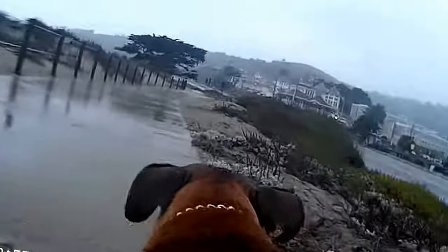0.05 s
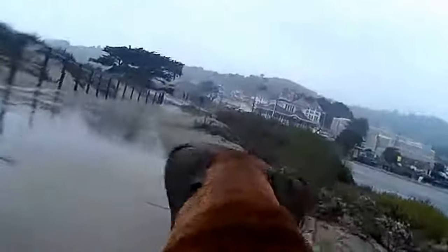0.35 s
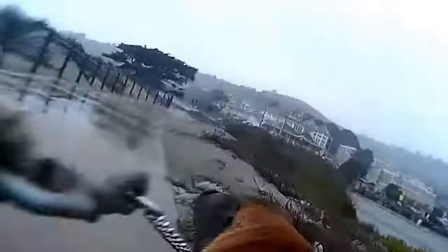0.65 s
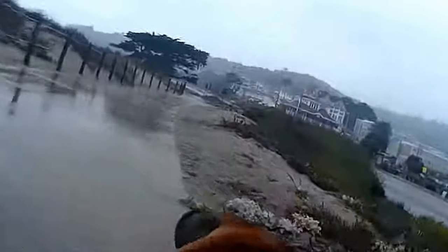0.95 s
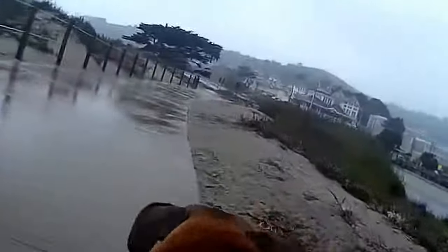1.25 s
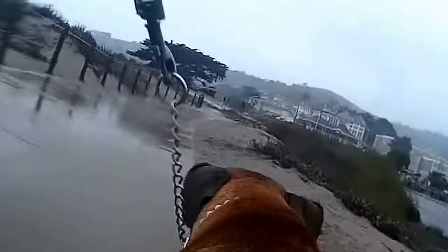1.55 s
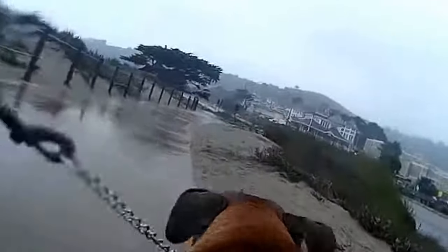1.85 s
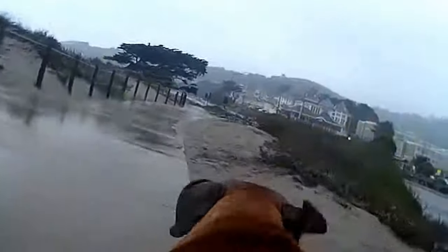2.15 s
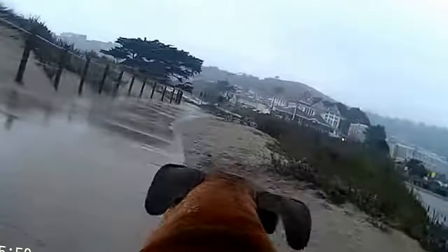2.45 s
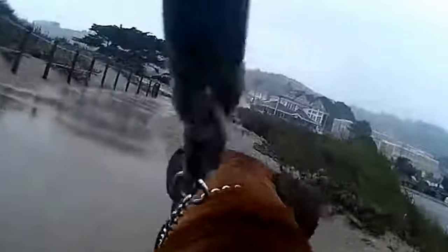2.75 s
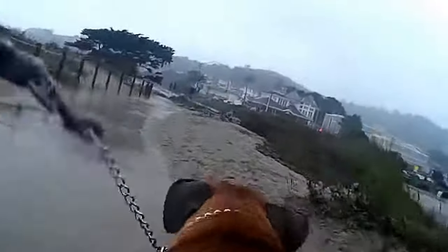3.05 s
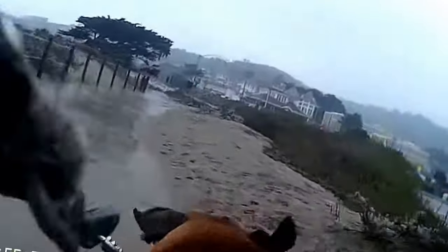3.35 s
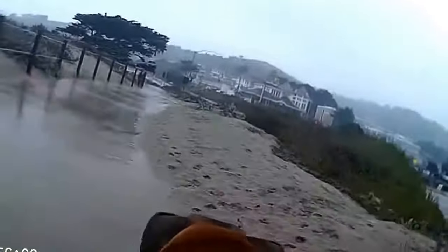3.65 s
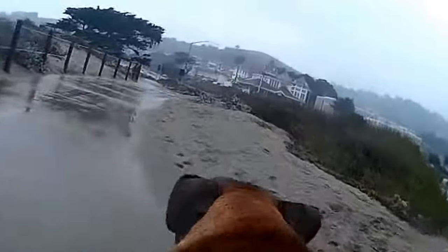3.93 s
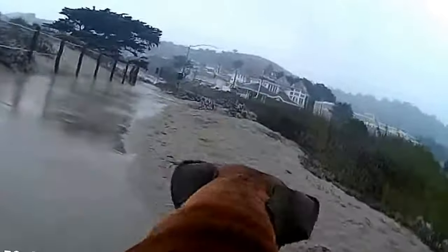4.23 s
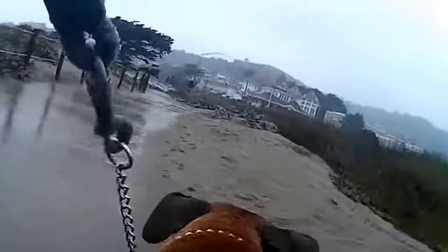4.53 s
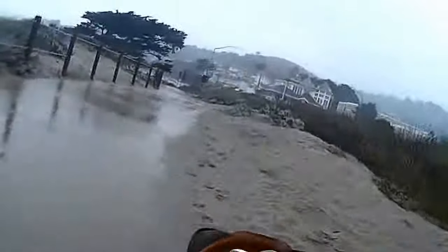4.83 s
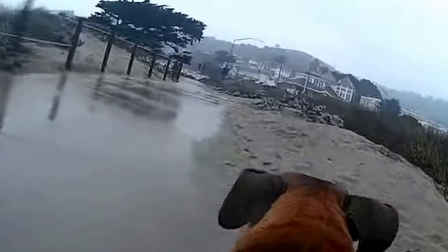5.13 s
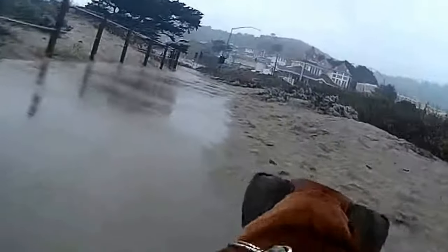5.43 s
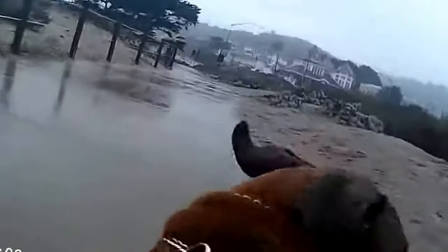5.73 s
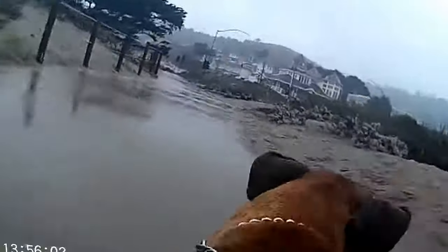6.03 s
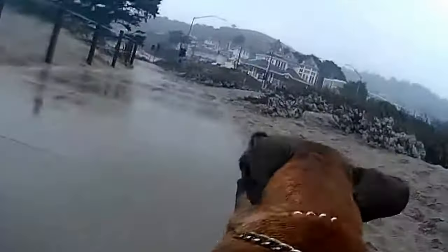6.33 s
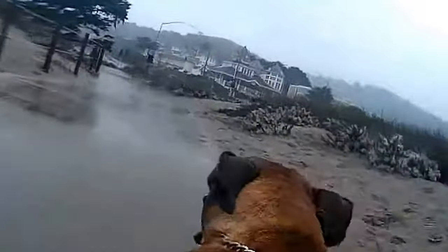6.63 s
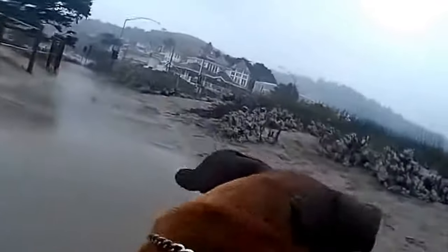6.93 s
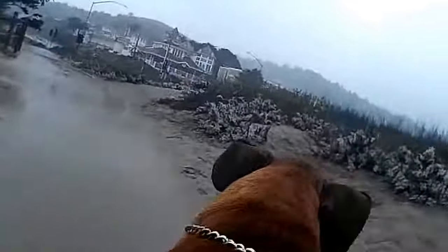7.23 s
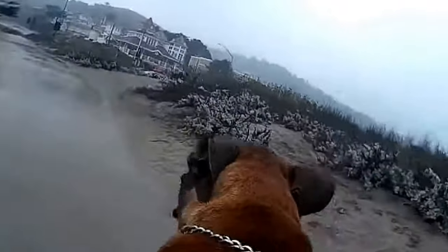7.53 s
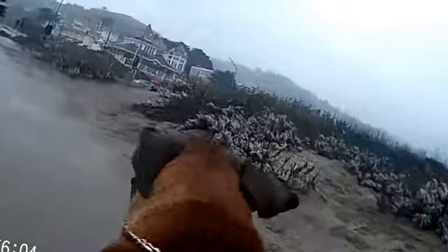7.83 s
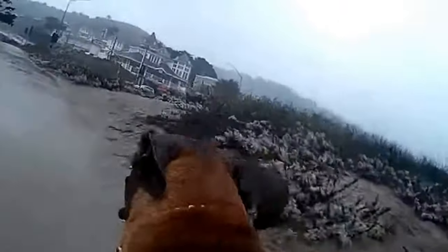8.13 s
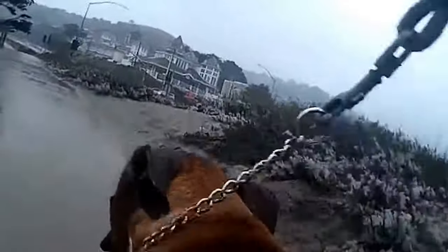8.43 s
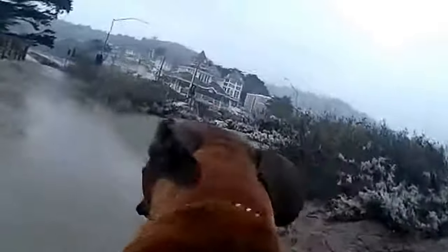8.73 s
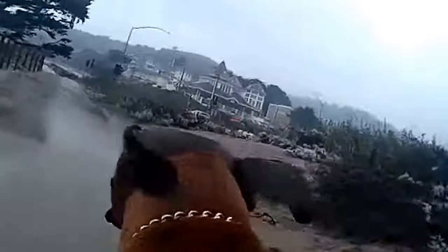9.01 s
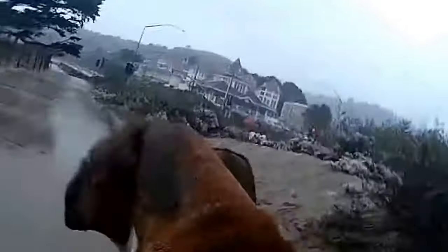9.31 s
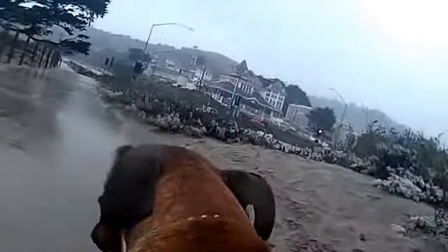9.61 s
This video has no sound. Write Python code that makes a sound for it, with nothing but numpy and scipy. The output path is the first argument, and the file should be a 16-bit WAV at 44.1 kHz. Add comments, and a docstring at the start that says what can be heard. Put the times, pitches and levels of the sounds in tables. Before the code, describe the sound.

Heard from inside a small plastic camera strapped to a moving dog, a low rumble and faint drizzle are soon broken by very close, hard clacks and short gritty rubs from a leash clip and chain. They crowd together in the middle, the hardest slightly overloading the microphone, then pause and return in one last flurry. Between them are light link ticks, dull bumps and soft footfalls on wet sand.

```python
"""Low rumble and muffled drizzle, soon broken by loud knocks on plastic: a small camera rides on a dog
trotting along a wet path. The leash clip and chain strike and rub the case, exciting its damped modes,
and the mount thuds with each blow; the hardest blows overload the microphone. Between them come soft
footfalls, dull bumps of the mount and faint chain ticks. A very faint whine joins late."""
import sys
import numpy as np
from scipy import signal
from scipy.fft import irfft, next_fast_len
from scipy.io import wavfile

SR = 44100
rng = np.random.default_rng(int(sys.argv[2]) if len(sys.argv) > 2 else 0)


def put_to_file(sound):
    """Save the sound as 16-bit audio at rate SR, in the file named by the first command-line argument."""
    columns = np.atleast_2d(sound).T  # one column per channel
    safe = np.clip(columns, -1, 1)
    whole_steps = np.round(safe * 32767)
    wavfile.write(sys.argv[1], SR, whole_steps.astype(np.int16))


N = 430857

# How hard the harness rocks on the dog's back: t/s, level/dB
ROCKING_LEVELS = [(0.0, -53), (0.49, -44.5), (1.71, -48), (2.99, -45), (4.49, -45), (4.79, -41),
                  (5.69, -47), (5.85, -40.5), (6.8, -44.5), (7.51, -46.5), (7.92, -40.5), (8.19, -47.5),
                  (9.03, -46), (9.77, -40.5)]
# Chain and strap dragged over the case, levels relative:
# start t/s, end t/s, early level/dB, late level/dB, favoured f/Hz, tug level/dB
DRAGS = [(0.538, 0.631, -35.5, -33, 3040, -43.5), (1.19, 1.201, -36, -37.5, 1600, -29),
         (1.291, 1.325, -28.5, -53, 1860, -37), (3.392, 3.441, -29.5, -26.5, 4900, -30.5),
         (3.98, 4.04, -36, -26, 2090, -35.5), (4.198, 4.279, -36.5, -42.5, 1500, -38.5),
         (4.637, 4.695, -39.5, -32.5, 3070, -41), (4.848, 4.89, -58, -47, 2140, -36),
         (4.918, 4.963, -40.5, -41, 1480, -29.5), (5.008, 5.054, -37.5, -47, 2280, -32),
         (5.229, 5.293, -34.5, -48.5, 3500, -37.5), (5.282, 5.402, -28.5, -29, 2970, -33.5),
         (5.399, 5.448, -40.5, -50, 2470, -27), (5.799, 5.907, -39, -41, 4250, -42),
         (6.005, 6.052, -55, -32, 1713, -32), (7.705, 7.752, -35.5, -45, 1300, -31),
         (7.858, 7.908, -41.5, -39, 2080, -38.5), (7.917, 7.996, -31, -28.5, 2180, -25.5),
         (8.01, 8.053, -59, -40, 2040, -31.5), (8.076, 8.115, -48.5, -49.5, 1300, -37)]


def gain_of(db):
    """Amplitude ratio: a factor of ten per 20 dB."""
    return 10 ** (np.asarray(db) / 20)


def unit_rms(x):
    """Normalisation to unit mean power."""
    return x / np.sqrt(np.mean(x ** 2) + 1e-20)


def add(mix, s, sound):
    """Superposition: a sound joins the mix at s seconds."""
    part = mix[max(round(s * SR), 0):][:len(sound)]
    part += sound[:len(part)]


def noise(shape):
    """Fourier synthesis: a random spectrum under a shape gives N samples of rms 1."""
    real, imag = rng.standard_normal((2, len(shape)))
    return unit_rms(irfft((real + 1j * imag) * shape)[:N])


def coloured(points):
    """Spectral shaping: noise of rms 1 following points of f/Hz, relative level/dB."""
    hz, db = np.transpose(points)
    f = np.fft.rfftfreq(next_fast_len(N, True), 1 / SR)
    return noise(gain_of(np.interp(np.log(f + 1), np.log(hz), db)))


def wander(limit_hz):
    """Band-limited random fluctuation of rms 1."""
    f = np.fft.rfftfreq(next_fast_len(N, True), 1 / SR)
    return noise((f < limit_hz) * (f > 0))


def ring(hz, decay_s, onset_s=0.00022):
    """Damped oscillator: a sine builds up during the contact and decays exponentially."""
    t = np.arange(4096) / SR
    return (1 - np.exp(-t / onset_s)) * np.exp(-t / decay_s) * np.sin(2 * np.pi * hz * t)


def case(focus_hz, octaves, detune=0.037):
    """Modal summation: a contact favours case modes near focus_hz, and each spot rings differently."""
    # Modes of the plastic case, and last the faint, long ring of the metal leash clip: f/Hz, bandwidth/Hz,
    # relative level/dB
    modes = [(588, 110, -6.5), (936, 140, -7), (1113, 295, 4), (1313.5, 282, 6), (1598, 260, 2.5),
             (1816, 326, 7.5), (1965.6, 286, 2.5), (2915, 450, -8.5), (3850, 430, -8.5), (5570, 1000, -4.5),
             (7760, 680, -14), (9250, 260, -21), (10700, 290, -17.5), (2000, 24, -51)]
    hz, width, db = np.transpose(modes)
    weight = 1 / (1 + (np.log2(hz / focus_hz) / octaves) ** 2)
    weight *= gain_of(db) / np.linalg.norm(weight)
    hz = hz * (1 + detune * rng.standard_normal(len(hz)))
    return sum((-1) ** k * weight[k] * ring(hz[k], 1 / (np.pi * width[k])) for k in range(len(hz)))


def whine(pitch_hz=2765, level_db=-81, start_s=7.3, blur_hz=80):
    """Random amplitude modulation blurs the third and fourth harmonics of a faint, late whine."""
    t = np.arange(N) / SR
    harmonics = sum(wander(blur_hz) * np.sin(2 * np.pi * k * pitch_hz * t) for k in (3, 4))
    return gain_of(level_db) * harmonics * (t > start_s)


def drizzle(level_db=-59, flutter_db=0.47):
    """Transmission loss: the case muffles a nearly steady wash of drizzle."""
    # Drizzle and air inside the case: f/Hz, relative spectral level/dB
    spectrum = [(150, -0.5), (350, -7.5), (520, -3.5), (900, -1.5), (1100, -4), (1270, 3), (1550, -5),
                (1920, 0), (2450, -11), (4200, -15.5), (7000, -20), (11000, -21.5), (15000, -23)]
    return coloured(spectrum) * gain_of(level_db + flutter_db * wander(5.3))


def harness(rumble_jolt_db=4, rustle_db=-65, rustle_jolt_db=2):
    """Common modulation: the same jolts swell the rumble and the rustle of the rocking harness."""
    # Rumble of the harness: f/Hz, relative spectral level/dB
    spectrum = [(8.8, -36.5), (15, 1), (38, -5), (102, -16.5), (140, -22.5), (186, -23.5), (270, -29),
                (329, -28), (450, -36), (580, -59), (990, -120)]
    rocking_db = np.interp(np.arange(N) / SR, *np.transpose(ROCKING_LEVELS))
    jolts = np.minimum(wander(7.4), 2)
    rumble = coloured(spectrum) * gain_of(rocking_db + rumble_jolt_db * jolts)
    rustle = coloured([(40, -19), (130, -3), (330, -10), (600, -16.5), (2500, -50)])
    return rumble + rustle * gain_of(rustle_db + rustle_jolt_db * jolts)


def paws(steps_per_s=6.3, nudge_db=5, nudge_hz=58, pat_db=-4, pat_hz=520, pat_s=0.013, spread_db=14):
    """Soft impacts carry little treble: each paw pats the wet sand and nudges the harness."""
    out, t = np.zeros(N), np.arange(4096) / SR
    muffle = signal.butter(2, [pat_hz / 4, pat_hz], "band", fs=SR)
    nudge = ring(nudge_hz, decay_s=.013, onset_s=.003)
    for k in range(int(N / SR * steps_per_s)):
        stray, weight, wetness = rng.random(size=3) - .5
        s = (k + .5 + stray) / steps_per_s
        pat = unit_rms(signal.lfilter(*muffle, rng.standard_normal(len(t)))) * np.exp(-t / pat_s)
        effort_db = np.interp(s, *np.transpose(ROCKING_LEVELS))
        add(out, s, gain_of(effort_db + nudge_db + spread_db * weight) * nudge)
        add(out, s, gain_of(effort_db + pat_db + spread_db * wetness) * pat)
    return out


def bumps(level_db=2, decay_cycles=0.86):
    """Damped vibration: dull, low bumps of the mount, some under the knocks and some between them."""
    # Low bumps of the mount: t/s, relative level/dB, f/Hz
    low_bumps = [(0.169, -37, 87), (0.536, -14.5, 42.4), (0.572, -17, 84), (0.938, -32, 73.5),
                 (2.501, -19, 180), (2.645, -13, 227), (2.103, -14.5, 54.6), (2.884, -16.5, 92),
                 (3.928, -13, 220), (4.589, -4, 155), (5.012, -19.5, 150), (6.333, -32, 72.7),
                 (6.425, -35.5, 102), (6.647, -30, 156), (6.782, -30, 73), (7.155, -21.5, 278),
                 (7.168, -20.5, 210), (7.416, -11, 137.6), (7.709, -14.5, 108.9), (8.443, -30, 73),
                 (8.775, -33, 78), (9.279, -29, 73), (9.557, -33.5, 130)]
    out = np.zeros(N)
    for s, db, hz in low_bumps:
        add(out, s, gain_of(db + level_db) * ring(hz, decay_cycles / hz, onset_s=0.0014))
    return out


def tick(focus_hz, octaves, scuff_s=.0012):
    """Noise-burst excitation of the case: a light, dry touch of peak 1."""
    scuff = rng.standard_normal(300) * np.exp(-np.arange(300) / SR / scuff_s)
    sound = np.convolve(scuff, case(focus_hz, octaves))
    return sound / abs(sound).max()


def collar(tap_db=2, brightness=1.5, tick_db=-54, spread_db=3.5, low_hz=2300, high_hz=6500, ticks=190):
    """Harder contacts excite higher modes: light collar taps among fainter, random ticks of its links."""
    # Clearest taps: t/s, relative level/dB, favoured f/Hz before the brightness factor
    taps = [(0.0753, -46, 2220), (0.264, -47, 2000), (0.66, -43, 1900), (0.955, -48, 5900),
            (1.08, -49, 2100), (1.4936, -39.5, 1990), (1.5714, -37.5, 1800), (1.8997, -41.5, 2670),
            (1.956, -41.5, 1680), (2.7307, -46, 2600), (3.128, -44, 2570), (3.518, -37, 1830),
            (6.254, -33, 1710), (6.341, -36, 1670), (6.4352, -40.5, 2020), (6.652, -38, 1630),
            (9.5605, -43.5, 1103)]
    out = np.zeros(N)
    for s, db, focus_hz in taps:
        add(out, s, gain_of(db + tap_db) * tick(focus_hz * brightness, octaves=1))
    for when, size, hardness in rng.random((ticks, 3)):
        db = tick_db - spread_db * np.log(max(size, .05))
        focus_hz = low_hz * (high_hz / low_hz) ** hardness
        add(out, when * N / SR, gain_of(db) * tick(focus_hz, octaves=.55))
    return out


def grit(force, low_hz=4500, spread_db=4, grain_samples=16):
    """Granular friction: sand in a sliding contact breaks the force into uneven, bright crackle."""
    sizes = np.minimum(rng.exponential(1, len(force) // grain_samples + 1), 4)
    grains = np.repeat(unit_rms(gain_of(spread_db * sizes)), grain_samples)[:len(force)]
    return signal.lfilter(*signal.butter(2, low_hz, "high", fs=SR), force * grains)


def thud(hz, damping=1.715, push_cycles=0.053):
    """Transient response of the mount: a shove dies away in about a cycle."""
    return ring(hz, 1 / (damping * hz), push_cycles / hz)


def driven(force, response):
    """Forced vibration: the force is convolved with an impulse response of unit energy."""
    return signal.fftconvolve(force, response / np.linalg.norm(response))


def rubs(slips_per_s=1500, spread_db=2.5, jerk_db=4, level_db=-1, grit_db=-17, grit_hz=4000,
         rasp_db=-12, tug_level_db=-4):
    """Stick-slip friction: dense, jerky clicks drive the case, the rasping link and the mount."""
    out, jerks = np.zeros(N), jerk_db * wander(150)
    link = ring(hz=3200, decay_s=.0009)
    mount = ring(hz=260, decay_s=.0011, onset_s=.0004)
    for start, end, early_db, late_db, focus_hz, tug_db in DRAGS:
        n = max(round((end - start) * SR), 256)
        sizes = gain_of(spread_db * np.minimum(rng.exponential(1, n), 4)) * rng.choice([-1, 1], n)
        grip = gain_of(jerks[round(start * SR):][:n])
        slipping = rng.random(n) < slips_per_s / SR
        slips = unit_rms(grip * sizes * slipping) * signal.windows.tukey(n, .25)
        pressure_db = np.interp(np.arange(n) / n, [1 / 4, 3 / 4], [early_db, late_db])
        force = slips * gain_of(level_db + pressure_db)
        hardness = (focus_hz / grit_hz) ** 2
        add(out, start, driven(force, case(focus_hz, octaves=0.91)))
        add(out, start, gain_of(grit_db) * hardness * grit(force))
        add(out, start, gain_of(rasp_db) * driven(force, link))
        add(out, start, gain_of(tug_db + tug_level_db) * driven(slips, mount))
    return out


def catches(per_s=30, accent_db=14.5, spread_db=6):
    """Impulsive loading: dragged links snag at random, each giving case and mount a small knock."""
    out = np.zeros(N)
    for start, end, early_db, late_db, _, tug_db in DRAGS:
        count = max(round((end - start) * per_s), 1)
        for k, (when, size) in enumerate(rng.random(size=(12, 2))[:count]):
            along = (k + when) / count
            s = start + along * (end - start)
            snag_db = accent_db + spread_db * (size - .5)
            pressure_db = early_db + along * (late_db - early_db)
            add(out, s, gain_of(snag_db + pressure_db) * case(focus_hz=1100, octaves=.6))
            add(out, s, gain_of(snag_db + tug_db) * thud(hz=280))
    return out


def knocks(skid_s=.005, grit_db=-23, grit_growth=0.4, rebound_s=.005, rebound_db=-7,
           sway_db=-10, sway_growth=0.76, sway_octave_db=6.5, reference_thud_hz=280,
           sway_hz=100, sway_octaves=1.7):
    """Impact excitation: each blow rings the case, skids, rebounds and shoves the mount, which sways."""
    # Blows of clip and chain, levels relative:
    # t/s, ring level/dB, favoured f/Hz, skid level/dB, thud level/dB, thud f/Hz
    blows = [(0.53, 15.5, 1630, -3.5, 7, 230), (0.583, -11, 1620, -35, -34, 250),
             (0.6156, -5, 1150, -5, -14, 232), (1.2057, -7.5, 890, -15, -16.5, 232),
             (1.2965, -15, 1900, -35, -38, 400), (1.7017, 9.5, 1690, -7, -7.5, 330),
             (2.098, 9.5, 826, 0.5, -7.5, 204), (2.6459, 6.5, 3350, -9, 1, 366),
             (2.8814, -4, 1260, -6, -32, 193), (3.195, 0, 1580, 0.5, -2.5, 430),
             (3.2026, 0, 4200, -8, -6.5, 282), (3.2364, -8, 1720, -19.5, -16.5, 174),
             (3.393, -8, 4600, -5.5, -6.5, 307), (3.3993, -12, 1020, -25, -12.5, 233),
             (3.4094, 4.5, 4600, -27, -21, 290), (3.4313, -4, 1660, -1.5, -23, 250),
             (3.538, 0.5, 1410, 1, -7.5, 195), (3.5468, 18.5, 2050, -15, -11, 704),
             (3.8847, 20, 983, -1.5, 11, 286), (3.968, 35.5, 1607, 4.5, 17.5, 350),
             (4.021, -11, 820, -27, -12.5, 260), (4.041, -18, 1286, -26, -18, 255),
             (4.1982, -7, 825, -22, -16.5, 198), (4.222, -3, 1340, -36, -17, 307),
             (4.584, 23, 1340, 2, 14.5, 287), (4.597, 13, 1540, 4, 0.5, 290),
             (4.679, -15.5, 1300, -13.5, -25, 258), (4.8117, -3.5, 870, -26, -4.5, 302),
             (4.8436, -39, 567, -30, -16.5, 220), (4.9419, -16, 570, -27, -8.5, 283),
             (4.9514, -8.5, 823, -19, -26, 296), (5.0552, -9.5, 760, -22.5, -30, 293),
             (5.2174, -7.5, 720, 0, 3.5, 320), (5.3126, 11, 1610, -0.5, -8, 650),
             (5.3267, 9, 1600, -1, -4.5, 594), (5.3573, -2.5, 1890, -9, -11, 403),
             (5.3757, 15.5, 570, -11.5, 0.5, 704), (5.3818, 11.5, 1440, 6.5, 2, 462),
             (5.4119, -9, 650, -13.5, -8, 292), (5.5697, 20, 1830, -9, -2, 516),
             (5.7425, 17, 1095, -1, 17, 472), (5.7739, 14.5, 1870, 1, -2, 260),
             (5.7974, -3, 1030, -7.5, -2.5, 283), (5.8936, -8, 2570, -17.5, -23, 705),
             (5.9694, 16, 2000, -12, 0, 580), (5.9953, 2, 760, -1.5, 4.5, 178),
             (6.0418, -1, 900, -14, -6.5, 260), (7.4129, 12.5, 780, 5, 7, 333),
             (7.7331, 2.5, 570, -4, -4.5, 220), (7.8333, 17.5, 806, 5.5, 11.5, 186),
             (7.9074, -18, 900, -17, -13.5, 170.5), (7.919, 9.5, 1600, -24, 1, 664),
             (7.9419, 20, 1450, -10.5, 6.5, 420), (7.9459, 12.5, 1680, -8.5, 1.5, 350),
             (7.9756, -1, 1630, -30, -6.5, 650), (7.9999, 10.5, 1470, -8, 0.5, 550),
             (8.0309, 12.5, 1470, -20.5, 0, 550), (8.0532, -2.5, 570, -5.5, -3, 260),
             (8.087, 8, 1435, -2.5, -11, 550), (8.105, 12.5, 1640, -19.5, -1.5, 623)]
    out, t = np.zeros(N), np.arange(2048) / SR
    for s, ring_db, focus_hz, skid_db, thud_db, thud_hz in blows:
        skid = rng.standard_normal(len(t)) * np.exp(-t / skid_s)
        skid /= np.linalg.norm(skid)
        add(out, s, gain_of(ring_db) * case(focus_hz, octaves=0.48))
        add(out, s, gain_of(skid_db) * signal.fftconvolve(skid, case(focus_hz, octaves=4.7)))
        crush_db = skid_db + grit_db + grit_growth * ring_db  # hard blows crush more sand
        add(out, s, gain_of(crush_db) * grit(skid))
        add(out, s, gain_of(thud_db) * thud(thud_hz))
        rebound = case(focus_hz=4670, octaves=0.44)
        add(out, s + rebound_s, gain_of((thud_db + skid_db) / 2 + rebound_db) * rebound)
        # Heavy, slow thuds sway the strap more, and it is never equally taut.
        heft_db = sway_growth * thud_db - sway_octave_db * np.log2(thud_hz / reference_thud_hz)
        strap_hz = sway_hz * 2 ** (sway_octaves * (rng.random() - .5))
        add(out, s, gain_of(sway_db + heft_db) * ring(strap_hz, decay_s=.008, onset_s=.00033))
    return out


def scene():
    """Superposition: all sources sum at the one microphone in the case."""
    return (knocks() + collar() + bumps() + harness() + drizzle() + whine()
            + catches() + paws() + rubs())[None]


def record(dry):
    """Saturation: the microphone overloads on hard blows; a low-pass filter then limits the band."""
    ceiling, edge_hz = .68, 16000
    clipped = dry / (1 + (dry / ceiling) ** 8) ** (1 / 8)
    low_pass = signal.firwin(161, edge_hz, window=("kaiser", 9), fs=SR)
    return signal.oaconvolve(clipped, low_pass[None], "same")


dry = scene()
out = record(dry)
put_to_file(out)
```